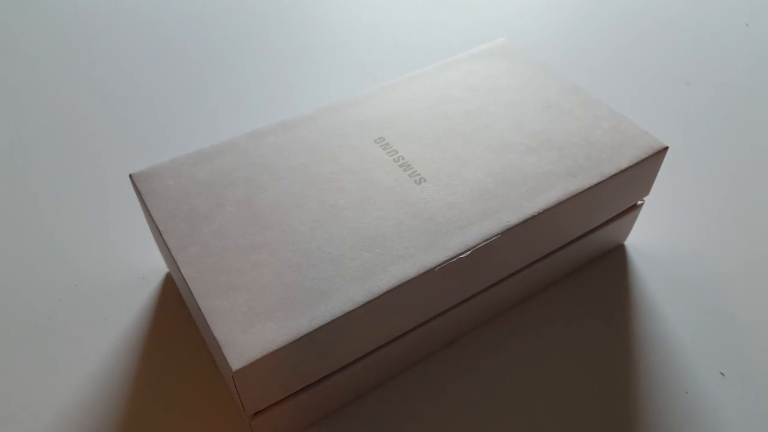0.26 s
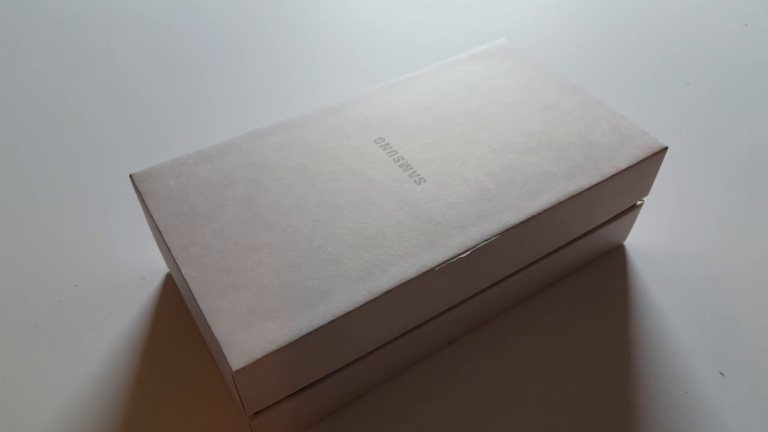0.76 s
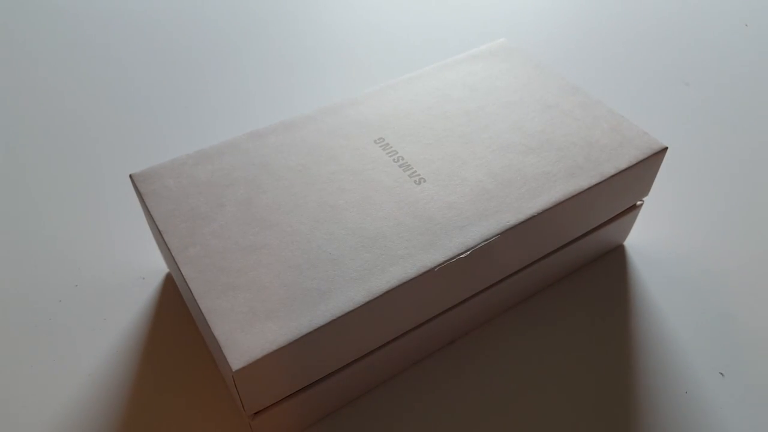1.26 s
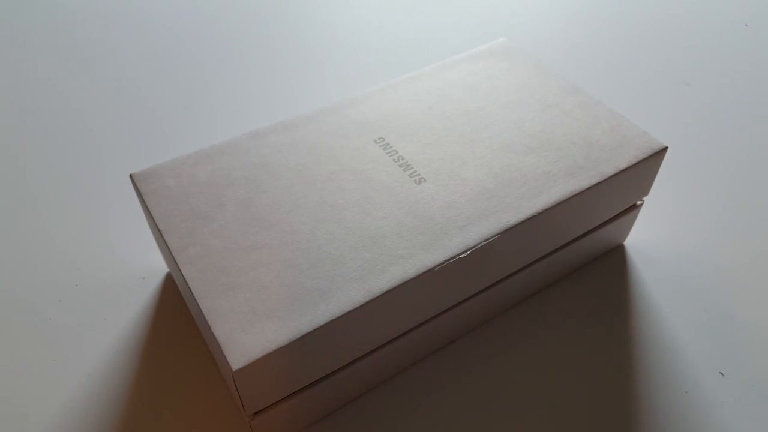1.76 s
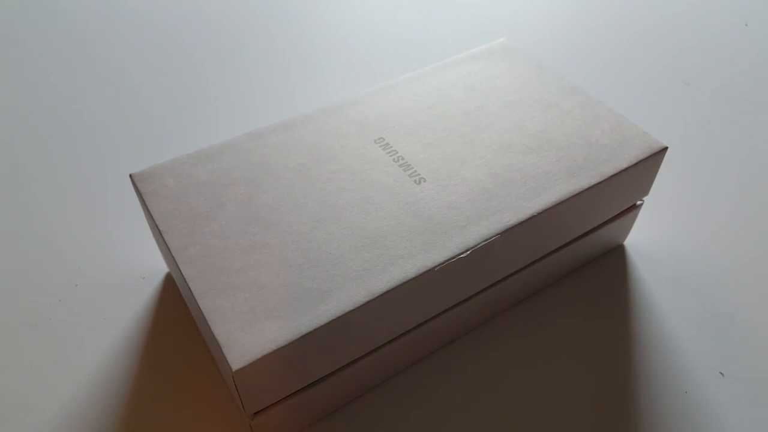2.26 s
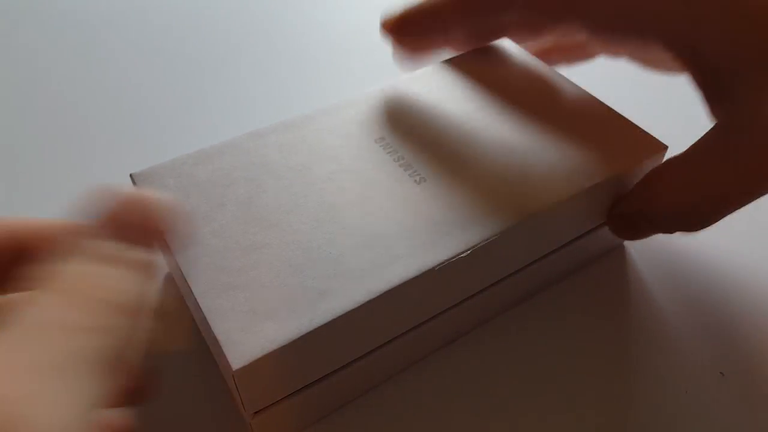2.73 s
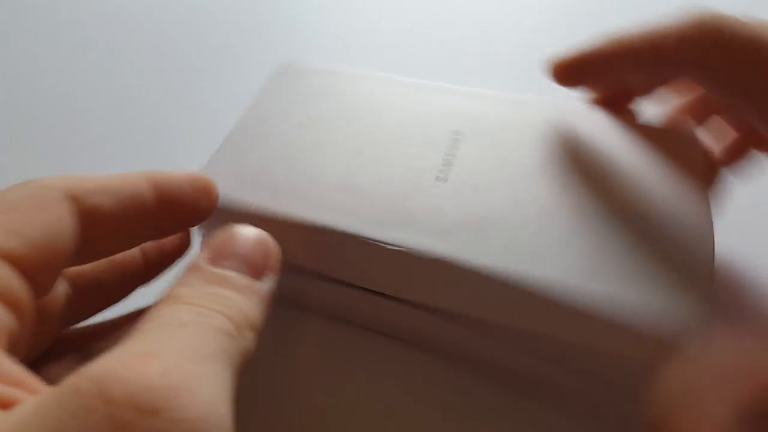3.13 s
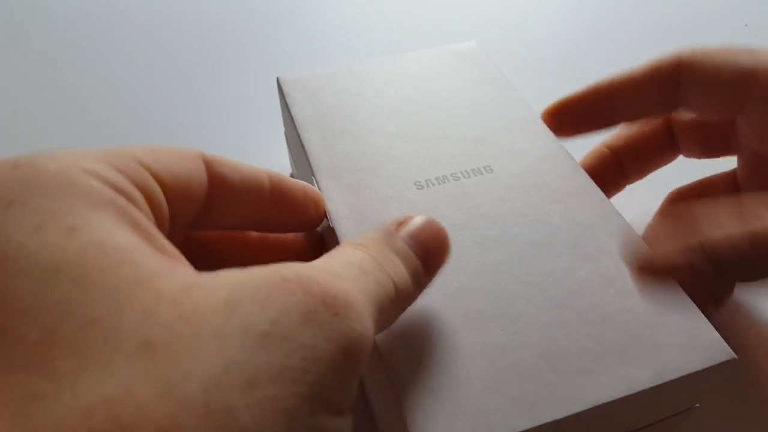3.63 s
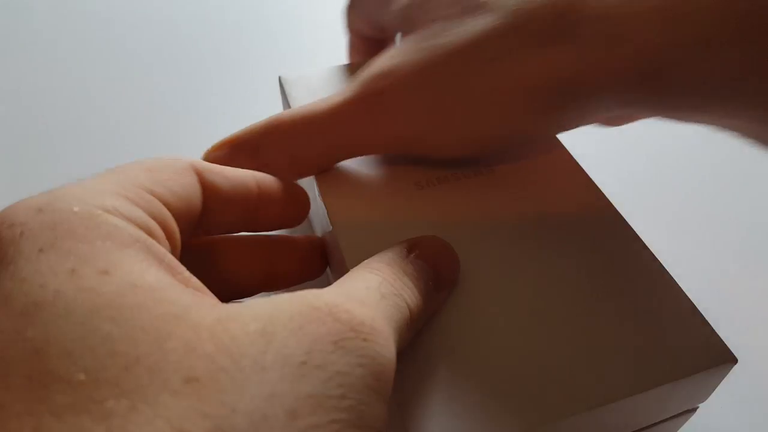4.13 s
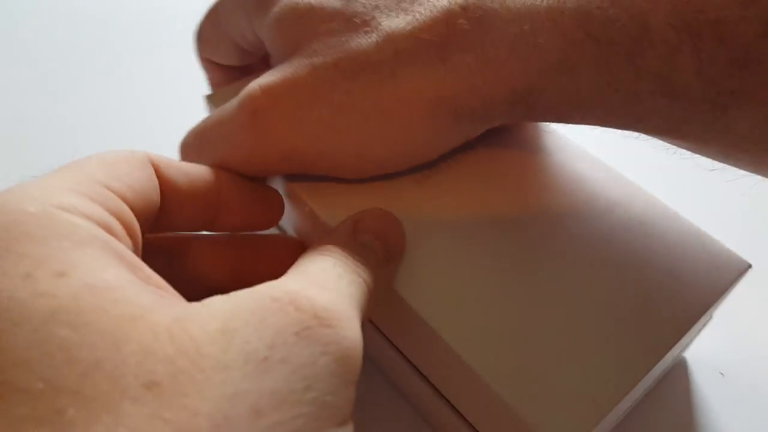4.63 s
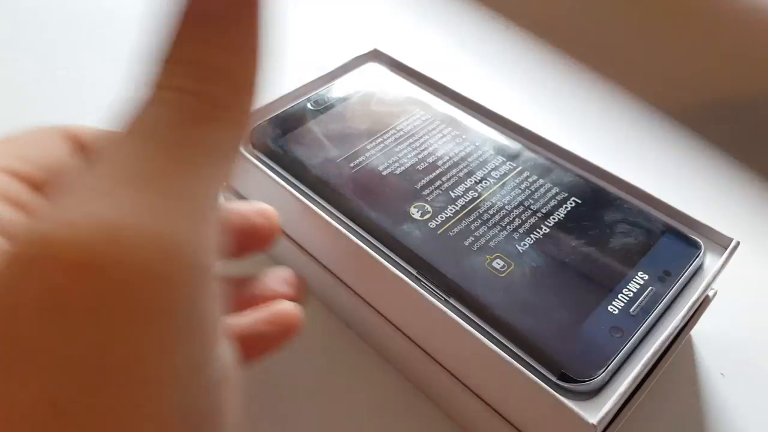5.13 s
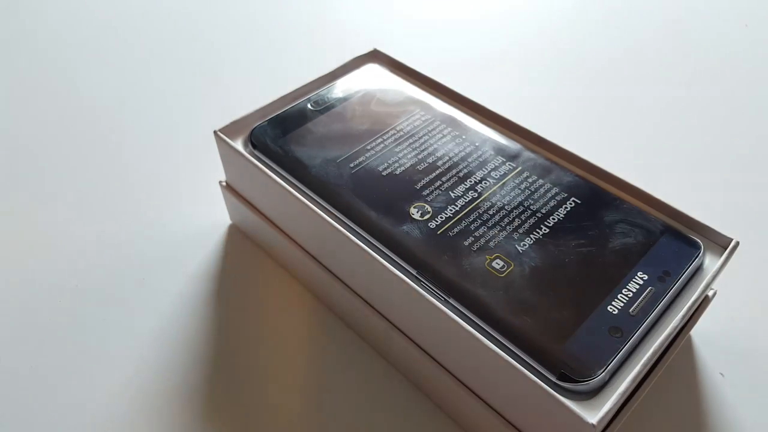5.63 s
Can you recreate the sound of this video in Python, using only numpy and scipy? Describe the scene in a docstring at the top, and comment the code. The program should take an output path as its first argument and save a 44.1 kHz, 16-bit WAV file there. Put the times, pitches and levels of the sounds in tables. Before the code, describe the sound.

A sharp knock lands on a table, followed by a brief hand sweep and a few lighter knocks with a short shove. Hands then turn a stiff cardboard box with a soft scrape and dull bumps. Its snug lid slides up in small rubbing slips, brushes free and is laid aside with a scuff. The sounds are close in a small, quiet room with a faint hum.

```python
"""Opening a cardboard box

A stiff box stands on a table in a small room, close to a two-port microphone. Things are put down,
hands turn and grip the box, and its snug lid slides up off the base. Impacts excite the damped modes
of the table top and the box; in every rub, paper fibres stick and slip and so radiate noise.
Faint air noise and mains hum lie underneath."""
import sys
import numpy as np
from scipy import signal
from scipy.fft import rfft, irfft, next_fast_len
from scipy.io import wavfile
from scipy.ndimage import uniform_filter1d, map_coordinates

SR = 44100
rng = np.random.default_rng(int(sys.argv[2]) if len(sys.argv) > 2 else 0)


def wav_out(sig):
    """Save sig, one row per channel (or a flat mono array), as 16-bit PCM at SR to the path in sys.argv[1]."""
    wavfile.write(sys.argv[1], SR, np.round(np.clip(np.atleast_2d(sig).T, -1, 1) * 32767).astype(np.int16))


N = 259749
T = np.arange(N) / SR

# Where the hands are at work. Each row: time in seconds, lag of the left port in ms.
HAND_LAG = [(.1, 0), (1.25, -0.17), (1.62, 0.1), (1.93, 0.17), (3.3, -0.15), (5.03, -0.085), (5.6, 0.31)]
# Slips of the snug lid. Each row: time in seconds, jolt in dB, contact cut-off in Hz, hiss in dB.
LID_SLIPS = [(4.448, -52.5, 103, -54), (4.527, -48, 410, -59), (4.612, -42, 190, -56),
             (4.837, -45, 122, -57.5)]


def undb(db):
    """Decibels to amplitude ratio."""
    return 10 ** (np.asarray(db) / 20)


def unit(x):
    """Normalisation to an rms of 1."""
    return x / np.sqrt(np.mean(x ** 2))


def on_log_axis(hz, points):
    """Interpolation of (Hz, value) points over log frequency."""
    f, value = np.transpose(points)
    return np.interp(np.log(np.maximum(hz, 1)), np.log(f), value)


def colour(x, spectrum, resonances=()):
    """Spectral shaping: a broad envelope with resonance peaks on top."""
    size = next_fast_len(x.shape[-1])
    hz = np.fft.rfftfreq(size, 1 / SR)
    peaks_db = sum(rise / (1 + (2 * (hz - f) / width) ** 2) for f, width, rise in resonances)
    gain = undb(on_log_axis(hz, spectrum) + peaks_db)
    return irfft(rfft(x, size) * gain, size)[..., :x.shape[-1]]


def cut(x, hz, kind, order=2):
    """Causal Butterworth filtering."""
    sections = signal.butter(order, np.minimum(hz, SR / 2 - 1), kind, fs=SR, output="sos")
    return signal.sosfilt(sections, x)


def walk(rate_hz, size):
    """Smooth random modulation with a spread near 1."""
    k = max(int(SR / rate_hz), 1)
    steps = np.repeat(rng.standard_normal(size // k + 1), k)
    return unit(uniform_filter1d(steps, k))[:size]


def ports(x, lag_ms):
    """Path difference: direct sound reaches the two ports a moment apart."""
    i = np.arange(len(x))
    lag = round(lag_ms * SR / 1000)
    return np.array([np.interp(i - max(delay, 0), i, x, left=0) for delay in (lag, -lag)])


def diffuse(size, apart_hz=900):
    """Diffuse-field noise: coherent at the two ports in the bass, incoherent in the treble."""
    mid, side = rng.standard_normal((2, size))
    side = cut(side, apart_hz, "high", order=1) + 0.03 * rng.standard_normal(size)
    return np.array([mid + side, mid - side])


def add(out, s, x):
    """Superposition of x on out from second s."""
    start = int(s * SR)
    out[:, start:start + x.shape[1]] += x[:, :N - start]


def room_tone():
    """Noise floor: diffuse air noise, mains hum and a thin whine, wavering by random modulation."""
    # Each row: frequency in Hz, relative spectral density in dB.
    air_spectrum = [(25, -11), (60, -9), (120, -4), (170, -5), (270, -6), (400, -9), (600, -14.5),
                    (1100, -19), (2200, -23), (3500, -27), (5000, -29), (9000, -37.5), (12500, -34),
                    (15500, -37)]
    # Each row: frequency in Hz, level in dB.
    tones = [(120, -69), (163, -74), (199.5, -71), (387.6, -80), (13318, -96)]
    air = unit(colour(diffuse(N, apart_hz=770), air_spectrum)) * undb(-63.5 + .5 * walk(1, N))
    hum = np.zeros(N)
    for hz, db in tones:
        amplitude = np.sqrt(2) * undb(db + 2 * walk(42, N))
        phase = 2 * np.pi * (hz * T + rng.random()) + .5 * walk(1.85, N)
        hum += amplitude * np.sin(phase)
    return air + hum


def modal_ring(t, modes, contact_hz, spot, spot_db):
    """Damped modes: a soft contact barely drives the high ones, and one struck at a node rings less."""
    hz, mode_db, t60 = np.transpose(modes)[:, :, None]
    polarity = (-1) ** np.arange(len(hz))[:, None]
    drive = polarity * undb(mode_db) / np.sqrt(1 + (hz / contact_hz) ** 4)
    # spot counts half waves of 100 Hz from the edge; bending waves shorten with the root of frequency
    drive *= undb(-spot_db * np.cos(2 * np.pi * spot * np.sqrt(hz / 100)))
    detune = 1 + 0.003 * rng.standard_normal(hz.shape)
    # the shorter the wave, the more its phase differs between the ports
    skew = np.array([1, -1])[:, None, None] * np.minimum(hz / 2000, 1) * rng.standard_normal(hz.shape)
    decay = np.exp(-np.log(1000) * t / t60)
    ring = np.sum(drive * np.sin(2 * np.pi * hz * detune * t + skew) * decay, axis=1)
    onset = np.minimum(t * contact_hz, 1)
    return cut(ring * onset, 56, "high")  # the ring carries little deep bass


def contact_thud(t, contact_hz):
    """Forced response: the surface gives way in one short swing, slower under a softer contact."""
    cycles = 0.68 * contact_hz * t
    envelope = np.exp(-2 * (cycles / 0.56 - 1) ** 2)
    return cut(np.sin(2 * np.pi * cycles) * envelope, 50.6, "high")


def room_clatter(t, cutoff_hz):
    """Reverberation: dense modes merge into noise, each band decaying at its own rate."""
    # Each row: frequency in Hz, relative level in dB.
    spectrum = [(100, -3), (250, 5), (500, -0.5), (900, -6.5), (1500, -11.5), (2000, -12), (2700, -16.5),
                (3500, -17), (5000, -21.5), (7500, -29.5), (11000, -12), (16000, -37)]
    # Each row: frequency in Hz, reverberation time in seconds.
    reverb_times = [(200, 0.28), (1000, 0.31), (3000, 0.28), (12000, 0.63)]
    noise = cut(colour(diffuse(len(t)), spectrum), cutoff_hz, "low")
    edges_hz = np.geomspace(60, 16000, 9)
    clatter = np.zeros_like(noise)
    for k, (lo, hi) in enumerate(zip(edges_hz, edges_hz[1:])):
        decay = np.exp(-np.log(1000) * t / on_log_axis(np.sqrt(lo * hi), reverb_times))
        clatter += (-1) ** k * cut(noise, [lo, hi], "band") * decay  # alternate signs avoid notches
    return clatter


def impacts(blows, modes, tick_s, tick_width, scatter_db, scatter_s, spot_db):
    """Impact sound: the surface thuds and rings, the contact ticks, and the room scatters the sound."""
    out, t = np.zeros((2, N)), np.arange(SR // 2) / SR
    early = SR // 40  # the first 25 ms set the level of a decaying part
    for s, ring_db, contact_hz, thud_db, clatter_db, clatter_hz, tick_db, tick_hz, spot in blows:
        ring = modal_ring(t, modes, contact_hz, spot, spot_db)
        clatter = room_clatter(t, clatter_hz)
        band = [tick_hz / (1 + tick_width), tick_hz * (1 + tick_width)]
        crushed_grain = .2 * rng.standard_normal(len(t)) * np.exp(-t / .003)
        tick = cut(np.exp(-t / tick_s) + crushed_grain, band, "band")
        scatter = cut(diffuse(len(t)), band, "band", order=3) * np.exp(-t / scatter_s)
        lag_ms = np.interp(s, *np.transpose(HAND_LAG))
        add(out, s, undb(ring_db) * ring / ring[:, :early].std()
            + undb(thud_db) * contact_thud(t, contact_hz)
            + undb(tick_db) * ports(tick / abs(tick).max(), lag_ms)
            + undb(clatter_db) * clatter / clatter[:, :early].std()
            + undb(tick_db + scatter_db) * scatter / scatter[:, :early].std())
    return out


def table_knocks():
    """Hard impacts excite the table's bending modes; the harder the contact, the more it clatters."""
    # Each row: start in seconds, ring in dB, contact cut-off in Hz, thud in dB, tick in dB,
    # clatter cut-off in Hz, spot struck in half waves of 100 Hz from the edge.
    knocks = [(0.072, -31.5, 796, -24.5, -53, 1830, 1), (0.096, -23.5, 734, -22, -37, 1570, 0.86),
              (0.1, -30, 1140, -10.5, -12, 2780, 0.78), (1.2321, -48, 1410, -45, -41, 5530, 0.49),
              (1.252, -42, 655, -51, -48, 2600, 0.58), (1.2694, -38.5, 895, -23, -43, 1500, 0.95),
              (1.2843, -43.5, 630, -24, -56, 1100, 1), (1.6222, -36, 420, -23.5, -40, 2000, 2),
              (1.68, -40, 395, -31, -37.5, 4990, 2.15), (1.9104, -39, 378, -35, -23.5, 5500, 2),
              (1.918, -41, 340, -31, -33, 3070, 2), (1.934, -47, 280, -24.5, -60, 1200, 2),
              (1.951, -57, 375, -31, -62, 700, 2)]
    # Each row: frequency in Hz, relative level in dB, time to fall 60 dB in seconds.
    table_modes = [(91.4, -6, 0.14), (131, 2, .3), (160.1, 0.5, 0.43), (198.3, -9.5, 0.35),
                   (228.6, -2.5, 0.45), (259, -7, 0.3), (300, 0.5, 0.34), (397, 1.5, 0.28), (482, -10, .14),
                   (539, -5.5, 0.28), (600, -5.5, 0.275), (652, -2, 0.22), (752, -2, 0.17),
                   (957, -14.5, .22), (1018, -8, 0.26), (1093, -7.5, 0.23), (1264, -5.5, .22),
                   (1347, -13, .22), (1480, -0.5, .2), (1525, -8, 0.23), (1675, 1, 0.18), (1836, 3, 0.186),
                   (1920, 13, 0.143), (1980, -2.5, 0.13), (2331, 0.5, .18), (2870, 5, 0.16)]
    blows = []
    for s, ring_db, contact_hz, thud_db, tick_db, clatter_hz, spot in knocks:
        clatter_db = ring_db + 0.5 + 4 * np.log2(contact_hz / 1000)
        tick_hz = 2210 * (clatter_hz / 1000) ** 0.1  # a brighter clatter has a higher tick
        blows.append((s, ring_db, contact_hz, thud_db, clatter_db, clatter_hz, tick_db, tick_hz, spot))
    return impacts(blows, table_modes, tick_s=0.00006, tick_width=0.24,
                   scatter_db=-24, scatter_s=0.025, spot_db=1.5)


def edge_cracks():
    """Broadband transients: a stiff edge snaps down and crushes grain; the room reverberates faintly."""
    # Each row: start in seconds, level in dB, decay time in seconds.
    cracks = [(0.1002, -32.5, 0.0015), (1.27, -40.5, 0.0032), (1.68, -40, 0.0032), (1.9108, -37, 0.0055),
              (1.9155, -34, 0.0033), (4.01, -44.5, 0.0037), (4.0135, -44.5, 0.003), (4.1363, -50.5, 0.0021),
              (5.034, -44, 0.0024), (5.222, -59.5, 0.0058), (5.673, -46, 0.0033)]
    # Each row: frequency in Hz, relative level in dB.
    spectrum = [(200, -21), (500, 1), (1000, 1), (2000, -2.5), (3500, -2.5), (5500, -10.5), (8500, -18),
                (12000, -15.5), (15500, -18.5)]
    reverb_db, reverb_s = -16, .025
    out, t = np.zeros((2, N)), np.arange(SR // 5) / SR
    for s, db, decay_s in cracks:
        grain = unit(colour(rng.standard_normal(len(t)), spectrum)) * np.exp(-t / decay_s)
        reverb = unit(colour(diffuse(len(t)), spectrum)) * np.exp(-t / reverb_s)
        lag_ms = np.interp(s, *np.transpose(HAND_LAG))
        add(out, s, undb(db) * (ports(grain, lag_ms) + undb(reverb_db) * reverb))
    return out


def box_bumps():
    """Soft impacts of the hands and jolts of the slipping lid excite the low modes of the box."""
    # Each row: start in seconds, ring in dB, contact cut-off in Hz, thud in dB, tick in dB,
    # tick pitch in Hz, spot struck in half waves of 100 Hz from the edge.
    bumps = [(0.854, -59.5, 200, -64, -77, 463, 0.79), (2.748, -51.5, 340, -55, -68, 700, 2.1),
             (2.819, -46.5, 168, -49, -76, 700, 1.43), (2.935, -53, 133, -47, -72, 1000, 2),
             (3.325, -53.5, 202, -37, -71, 1000, 2.2), (3.368, -45, 330, -32.5, -44, 700, 2),
             (3.408, -56, 520, -51, -44.5, 740, 1.8), (3.62, -59, 88, -42, -68, 1000, 0.86),
             (3.72, -61, 392, -51, -64, 1000, 1.9), (3.817, -53.5, 221, -43, -75, 1000, 1.9),
             (4.014, -44, 196, -31.5, -50, 900, 1.9), (4.042, -64, 272, -38, -74, 500, 1.8),
             (4.1353, -60, 560, -37, -61, 600, 1.5), (4.165, -58.5, 600, -59, -67, 596, 1.4),
             (4.222, -55.5, 560, -58, -56, 600, 1.1), (4.958, -55.5, 610, -38.5, -51, 900, 1.1),
             (5.034, -60.5, 393, -56.5, -64, 2980, 2.9), (5.565, -57, 190, -46, -59, 400, 2),
             (5.674, -61, 500, -46, -47, 2000, 2.8), (5.794, -48.5, 140, -35.5, -76, 303, 2),
             (5.811, -45.5, 150, -45, -78, 317, 1.8), (5.868, -75, 404, -50, -50, 1000, 1.8)]
    # Each row: frequency in Hz, relative level in dB, time to fall 60 dB in seconds.
    box_modes = [(56.7, -4, 0.1), (74.5, 2.5, 0.3), (133, -1, 0.29), (166.9, 9, 0.39), (201.8, 1, 0.39),
                 (228.7, -0.5, 0.49), (254, -2.5, 0.65), (302.5, 5, .3), (400.6, 7.5, 0.27), (453, 9, 0.26),
                 (535.4, 11.5, 0.23), (621, 17.5, 0.12)]
    slip_tick_hz, slip_spot = 4500, 1.92
    jolts = [(s, jolt_db, contact_hz, jolt_db + 11, hiss_db + 10, slip_tick_hz, slip_spot)
             for s, jolt_db, contact_hz, hiss_db in LID_SLIPS]
    # the clatter follows the tick in level and cut-off
    blows = [(s, ring_db, contact_hz, thud_db, tick_db - 8.5, 3 * tick_hz, tick_db, tick_hz, spot)
             for s, ring_db, contact_hz, thud_db, tick_db, tick_hz, spot in bumps + jolts]
    return impacts(blows, box_modes, tick_s=0.001, tick_width=0.94,
                   scatter_db=-12, scatter_s=.009, spot_db=2)


def stroke_envelopes(strokes):
    """Incoherent strokes add in power; each rises evenly, holds, and loses 20 dB per release time."""
    start, attack, hold, release, body_db, hiss_db = np.transpose(strokes)[:, :, None]
    let_go = start + attack + hold
    t = np.arange(start.min(), min((let_go + 2 * release).max(), T[-1]), 1 / SR)
    shape = np.clip((t - start) / attack, 0, 1) * undb(-20 * np.maximum(t - let_go, 0) / release)
    body_gain = np.linalg.norm(shape * undb(body_db), axis=0)
    hiss_gain = np.linalg.norm(shape * undb(hiss_db), axis=0)
    return t, body_gain, hiss_gain


def friction(strokes, spectrum, resonances=(), lag_ms=0, pan_db=0, direct_db=-4, catch_db=3,
             judder_db=0, rumble_db=-20, glide_per_s=0, wander=0):
    """Stick-slip noise of countless fibres; an uneven push makes them judder and the table rumble."""
    split_hz = 3200  # body below, hiss above
    t, body_gain, hiss_gain = stroke_envelopes(strokes)
    slips = unit(rng.standard_normal(len(t)) * undb(catch_db * walk(1500, len(t))))
    field = undb(direct_db) * ports(slips, lag_ms) + unit(diffuse(len(t)))
    rasp = colour(field, spectrum, resonances)
    # the resonances glide as a cavity grows and wander as the contact shifts
    centre_s = np.average(t, weights=body_gain ** 2)
    pitch = 1 + glide_per_s * (t - centre_s) + wander * walk(9, len(t))
    rasp = np.array([map_coordinates(port, [np.cumsum(pitch)], mode="mirror") for port in rasp])
    rumble = undb(rumble_db) * unit(cut(diffuse(len(t), apart_hz=237), [45, 220], "band"))
    body = (unit(cut(rasp, split_hz, "low", order=4)) + rumble) * body_gain
    hiss = unit(cut(rasp, split_hz, "high", order=4)) * hiss_gain
    push = undb(judder_db * walk(60.1, len(t)))
    balance = undb([[pan_db / 2], [-pan_db / 2]])
    out = np.zeros((2, N))
    add(out, t[0], (body + hiss) * push * balance)
    return out


def hand_sweep():
    """Light sliding friction: a hand sweeps the table with an even hiss."""
    # Each row: start, attack, hold and release in seconds, body and hiss in dB.
    strokes = [(1.04, .1, .22, .17, -63, -60.5)]
    # Each row: frequency in Hz, relative level in dB.
    spectrum = [(150, -25), (300, -5), (500, -2), (750, -9), (1300, -8), (2000, -10), (3000, -7),
                (5000, -14), (8500, -20), (11500, -9.5), (15500, -18)]
    return friction(strokes, spectrum, lag_ms=-.18, pan_db=1, direct_db=-2.5, catch_db=1, judder_db=.8)


def shove():
    """Friction drives the resonances of a thing shoved along the table."""
    # Each row: start, attack, hold and release in seconds, body and hiss in dB.
    strokes = [(1.622, 0.003, 0.035, 0.089, -44, -59), (1.685, 0.02, 0.04, 0.13, -42, -59),
               (1.872, 0.014, .02, 0.03, -51, -59)]
    # Each row: frequency in Hz, relative level in dB.
    spectrum = [(150, -41), (250, -16), (330, -14.5), (520, -20), (800, -26), (1200, -29.5), (1550, -36),
                (1920, -27), (2300, -35.5), (3300, -30.5), (6500, -40.5), (11000, -40), (15500, -45)]
    # Each row: centre and width in Hz, rise in dB.
    resonances = [(310, 40, 9), (590, 66, 5), (965, 80, 3.5), (1900, 130, 12)]
    return friction(strokes, spectrum, resonances, lag_ms=.18, judder_db=2, rumble_db=-14, wander=.02)


def box_turn():
    """Friction drives the resonances of the box as it scrapes round under resting fingers."""
    # Each row of both: start, attack, hold and release in seconds, body and hiss in dB.
    fingers = [(2.42, .22, .98, .3, -60.5, -60.5)]
    scrapes = [(2.87, 0.24, .22, .55, -51.5, -53), (3.04, 0.077, 0.085, 0.076, -58, -68)]
    # Each row: frequency in Hz, relative level in dB.
    spectrum = [(150, -50), (250, -10), (297, -3), (450, -4), (534, -2), (624, -3.5), (1030, -9),
                (1140, -4), (1530, -13.5), (2090, -14), (3160, -24.5), (4470, -31), (8470, -37),
                (11200, -28.5), (15500, -39)]
    # Each row: centre and width in Hz, rise in dB.
    resonances = [(520, 48, 6), (605, 40, 5), (773, 50, 6.5), (930, 70, 7), (1040, 47, 11), (1370, 60, 6),
                  (1640, 65, 8), (2110, 120, 5), (2590, 100, 5), (3550, 170, 2.5), (4600, 600, 3.5),
                  (5300, 330, 3.5)]
    return friction(fingers + scrapes, spectrum, resonances, lag_ms=.17, direct_db=-16.5,
                    judder_db=2, rumble_db=-7.5, wander=.015)


def box_grip():
    """Friction of skin on paper: a dull rub as the hands take hold."""
    # Each row: start, attack, hold and release in seconds, body and hiss in dB.
    strokes = [(3.56, 0.046, 0.25, 0.32, -55.5, -64), (3.795, 0.022, 0.03, 0.059, -64, -50.5),
               (3.92, 0.337, 0.088, 0.093, -60, -66)]
    # Each row: frequency in Hz, relative level in dB.
    spectrum = [(150, -21), (250, 3), (413, 5), (563, -6.5), (945, -12.5), (1250, -6), (1410, -13),
                (1560, -15), (1850, -17), (2530, -20.5), (4100, -27), (6540, -28), (9230, -30.5),
                (10800, -22), (15500, -38)]
    return friction(strokes, spectrum, lag_ms=.19, pan_db=-2, direct_db=-4.5, rumble_db=-8)


def lid_slide():
    """Stick-slip motion: the lid rises in hissing spurts; its resonances fall as the cavity grows."""
    # Creep, pull and coming loose. Each row: start, attack, hold and release in seconds,
    # body and hiss in dB.
    strokes = [(4.225, 0.087, 0.62, .06, -57, -64.5), (4.55, .1, .17, 0.11, -46.5, -60.5),
               (4.79, .04, .06, .04, -62, -59)]
    # Each row: frequency in Hz, relative level in dB.
    spectrum = [(150, -16), (250, -2), (474, -3), (635, -2.5), (823, -3), (1270, -3), (1480, -3),
                (2200, -4), (2490, -7.5), (3010, -6.5), (3450, -9), (4630, -7.5), (7250, -18),
                (12400, -12.5), (15500, -23)]
    # Air and panel resonances. Each row: centre and width in Hz, rise in dB.
    resonances = [(304, 25, 8), (484, 75, 6), (829, 60, 5.5), (1235, 130, 6), (1560, 120, 3), (1845, 85, 8),
                  (2180, 90, 7.5), (2480, 150, 2.5), (2950, 150, 7), (4480, 200, 3)]
    attack_s, hold_s, release_s = 0.04, 0.049, 0.031
    spurts = [(s - attack_s, attack_s, hold_s, release_s, hiss_db - 3.5, hiss_db)
              for s, _, _, hiss_db in LID_SLIPS]
    return friction(strokes + spurts, spectrum, resonances, lag_ms=-.16, pan_db=.2, direct_db=-1,
                    catch_db=0, judder_db=1, rumble_db=-9.5, glide_per_s=-.05)


def rim_brush():
    """Friction rings the almost free lid as its rim brushes off the base and catches at the edge."""
    # Each row: start, attack, hold and release in seconds, body and hiss in dB.
    strokes = [(4.958, 0.029, 0.039, 0.022, -52.5, -50.5), (5.031, 0.0014, 0.0028, 0.015, -53.5, -49.5)]
    # Each row: frequency in Hz, relative level in dB.
    spectrum = [(180, -2), (300, 2), (420, -14), (580, -8), (750, -15), (1050, -8), (1350, -12), (1900, -6),
                (2600, -13), (3400, -13), (4500, -7.5), (6360, -15), (11100, -14), (15500, -21)]
    # Each row: centre and width in Hz, rise in dB.
    resonances = [(2030, 140, 4), (4130, 140, 1), (4750, 500, 8)]
    return friction(strokes, spectrum, resonances, lag_ms=-.18, pan_db=.5, catch_db=7)


def lid_laid_aside():
    """Intermittent friction: a short, grainy scuff as the lid is laid down to the right."""
    # Each row: start, attack, hold and release in seconds, body and hiss in dB.
    strokes = [(5.622, .036, 0.016, 0.045, -52.5, -51.5)]
    # Each row: frequency in Hz, relative level in dB.
    spectrum = [(180, -16), (300, -10), (400, -2), (630, -2), (850, -2), (1350, -8.5), (1870, -0.5),
                (2250, -5), (2800, -5.5), (4420, -6), (6300, -9), (8010, -22), (11900, -10), (15500, -20)]
    return friction(strokes, spectrum, lag_ms=.3, pan_db=-7, direct_db=-11, catch_db=10)


def scene():
    """Superposition of impacts and friction noise over the quiet room."""
    strikes = table_knocks() + box_bumps() + edge_cracks()
    handling = hand_sweep() + shove() + box_turn() + box_grip()
    opening = lid_slide() + rim_brush() + lid_laid_aside()
    return strikes + handling + opening + room_tone()


def record(dry):
    """Band limiting: a steep elliptic low-pass removes the highest treble."""
    top_hz = 15800
    return signal.sosfilt(signal.ellip(10, .2, 70, top_hz, fs=SR, output="sos"), dry)


dry = scene()
out = record(dry)
wav_out(out)
```